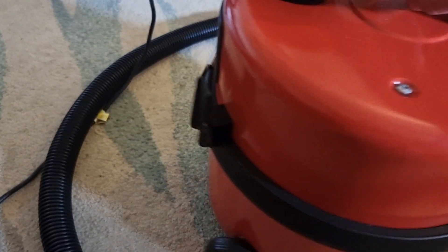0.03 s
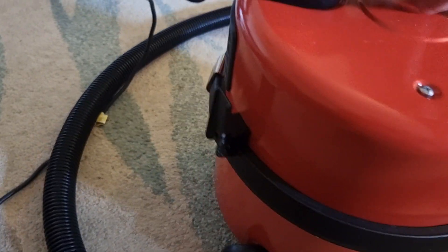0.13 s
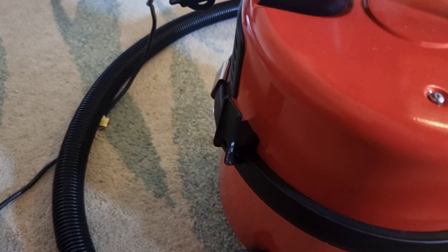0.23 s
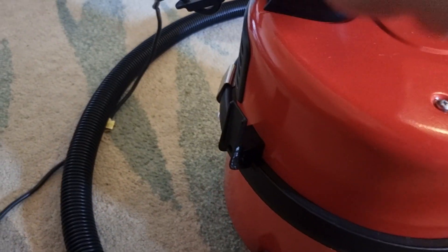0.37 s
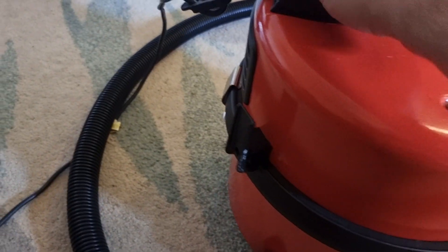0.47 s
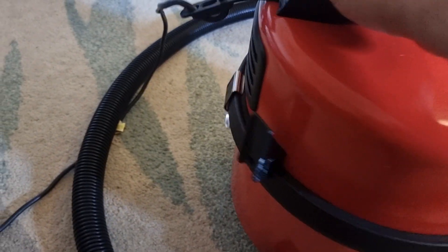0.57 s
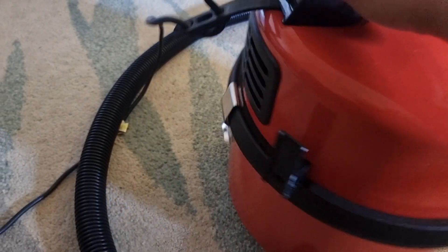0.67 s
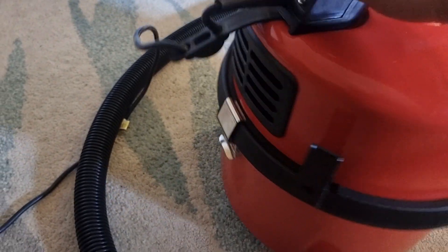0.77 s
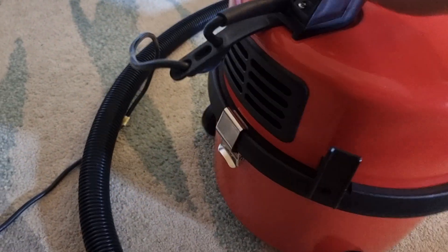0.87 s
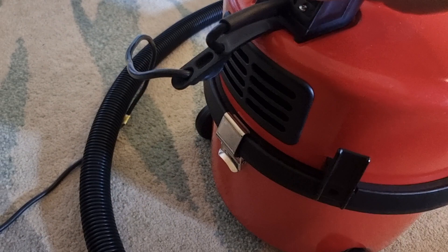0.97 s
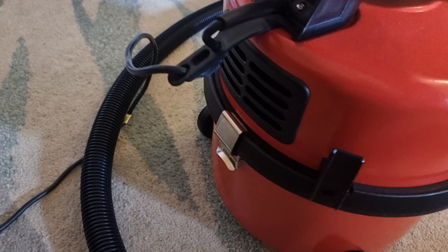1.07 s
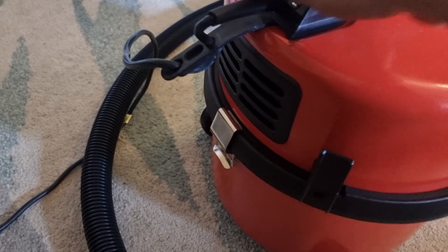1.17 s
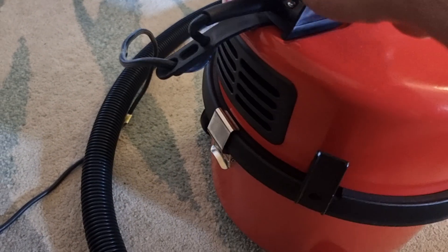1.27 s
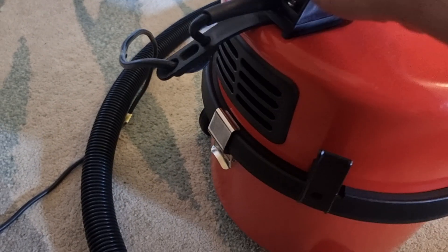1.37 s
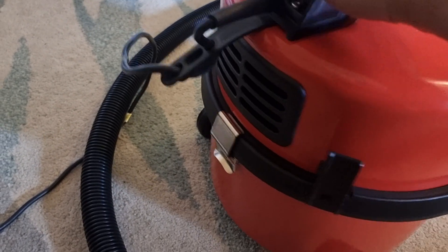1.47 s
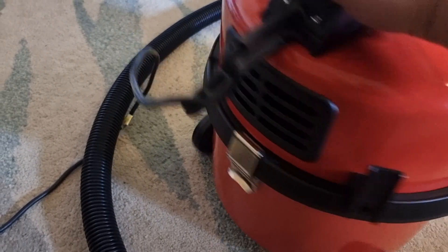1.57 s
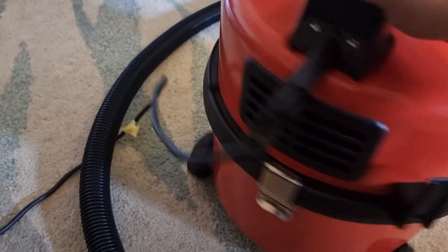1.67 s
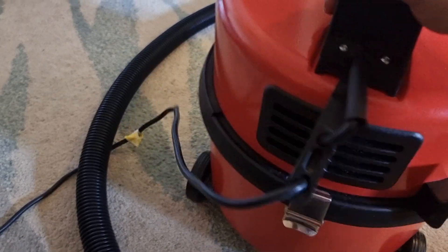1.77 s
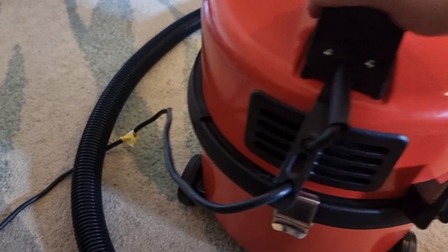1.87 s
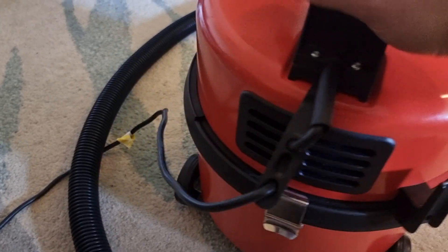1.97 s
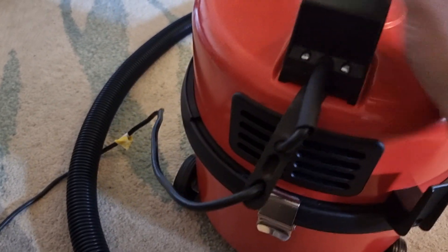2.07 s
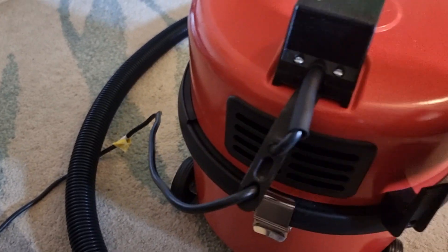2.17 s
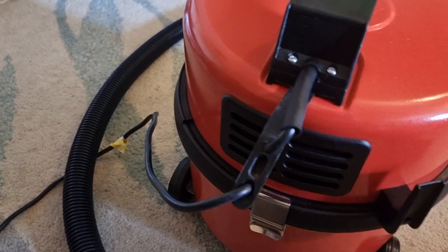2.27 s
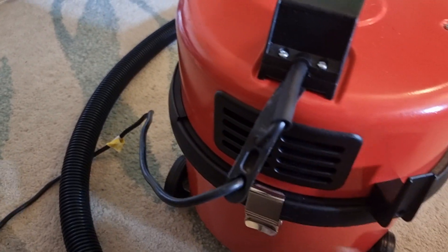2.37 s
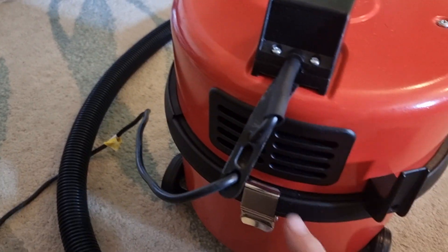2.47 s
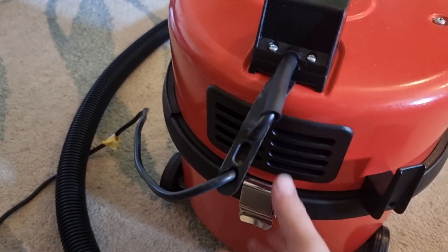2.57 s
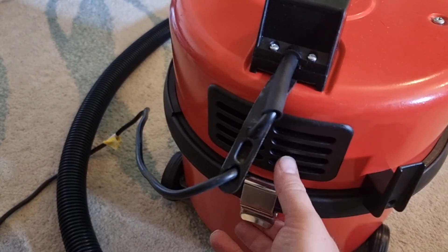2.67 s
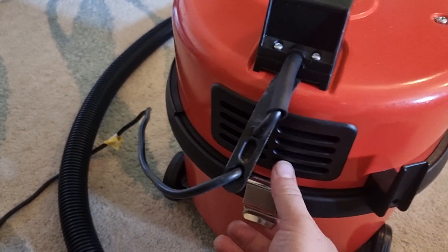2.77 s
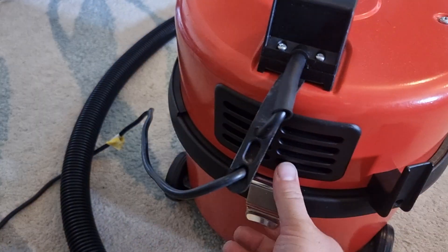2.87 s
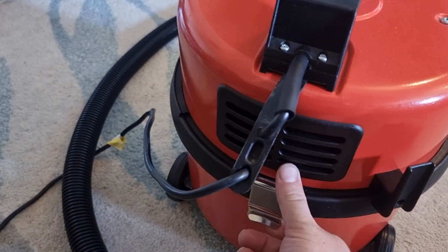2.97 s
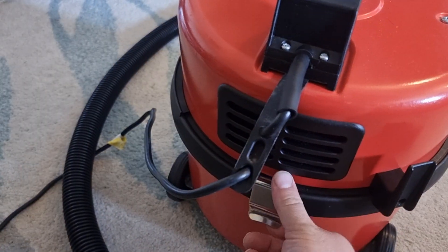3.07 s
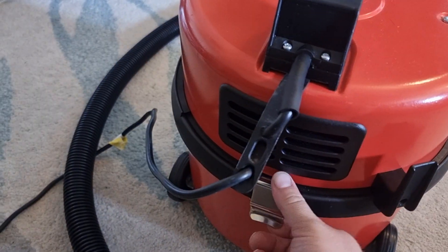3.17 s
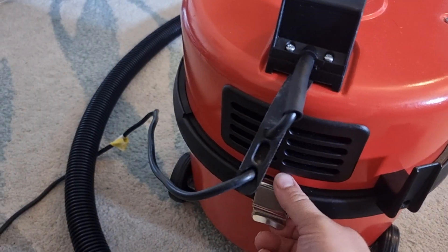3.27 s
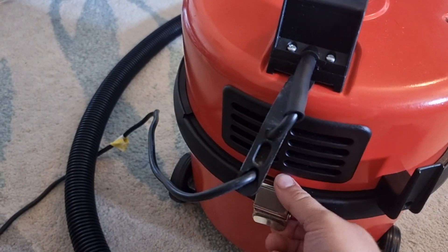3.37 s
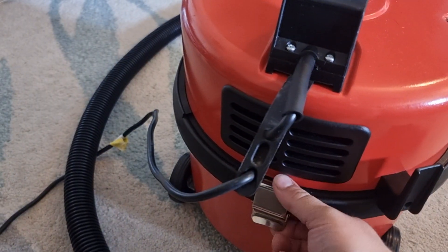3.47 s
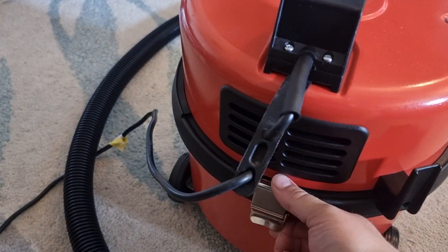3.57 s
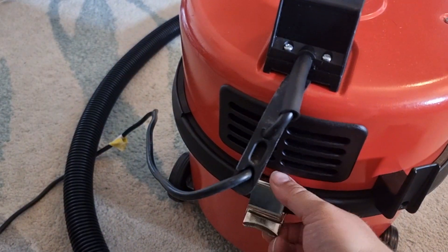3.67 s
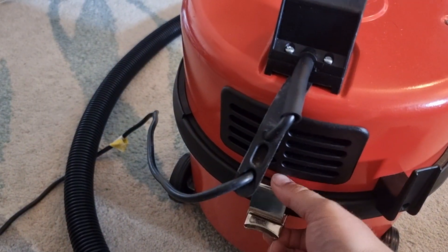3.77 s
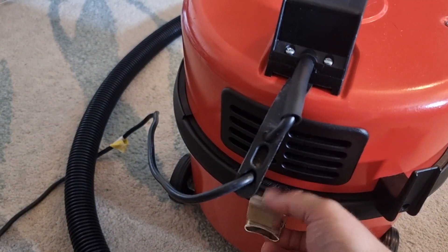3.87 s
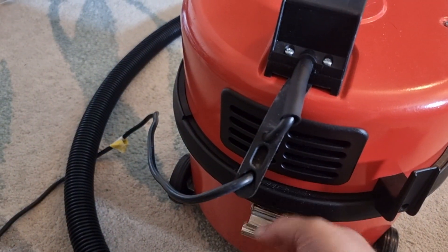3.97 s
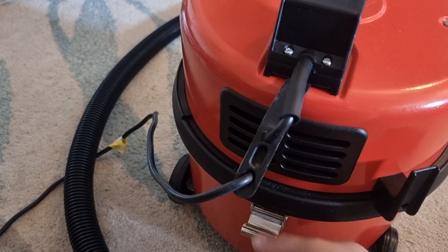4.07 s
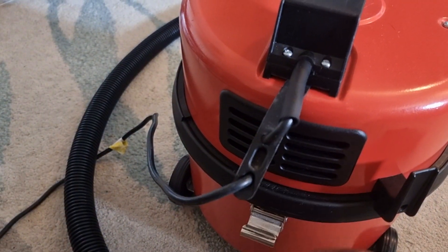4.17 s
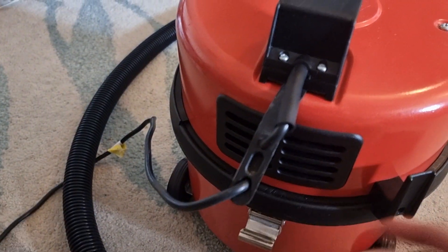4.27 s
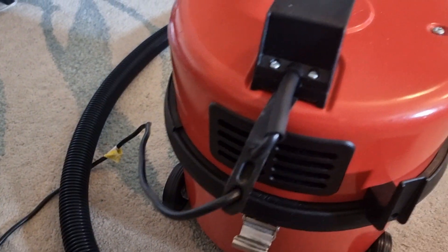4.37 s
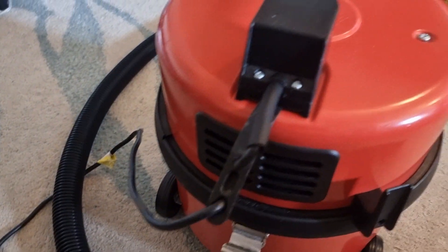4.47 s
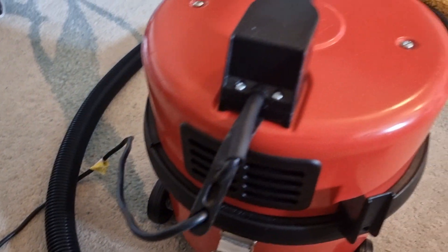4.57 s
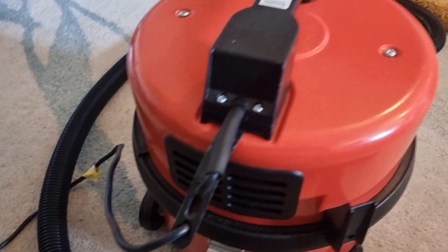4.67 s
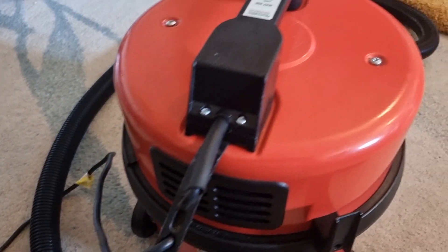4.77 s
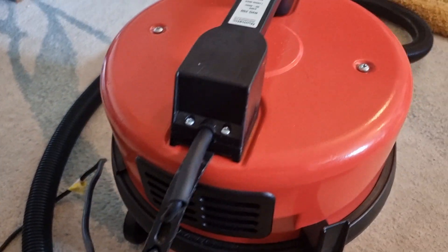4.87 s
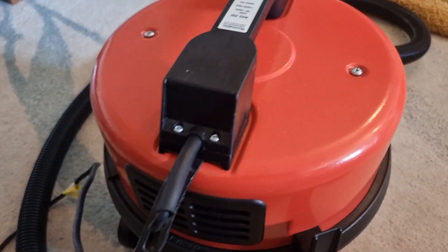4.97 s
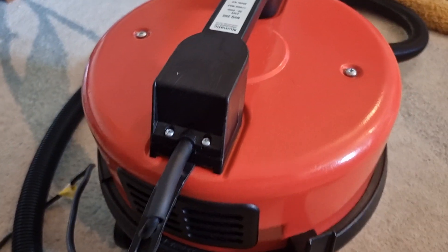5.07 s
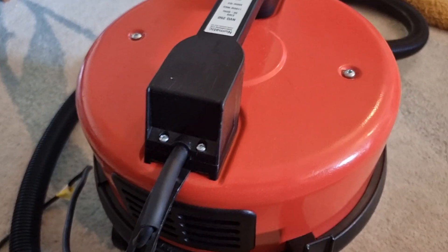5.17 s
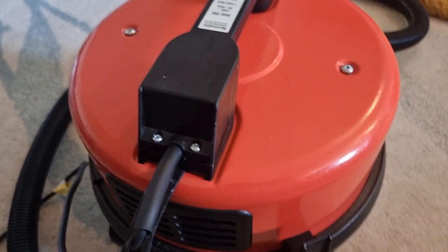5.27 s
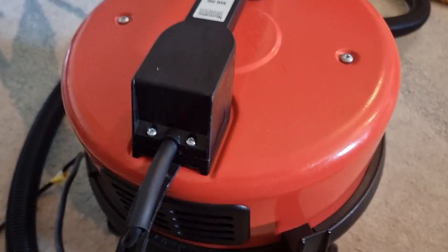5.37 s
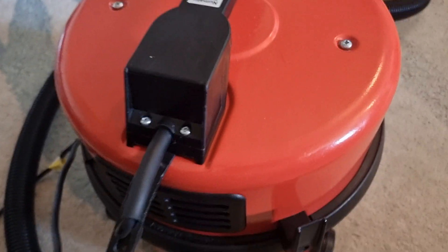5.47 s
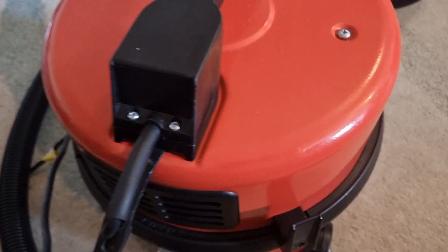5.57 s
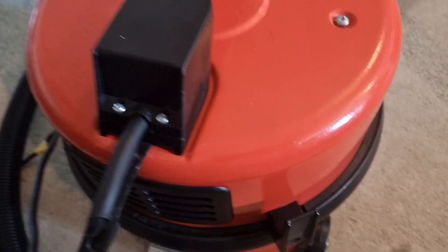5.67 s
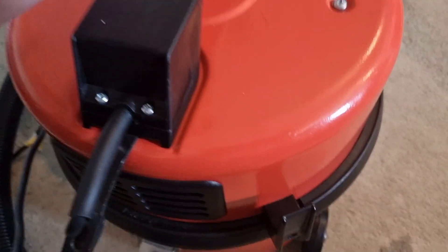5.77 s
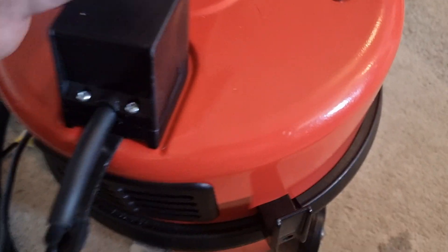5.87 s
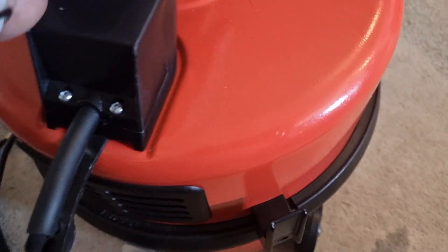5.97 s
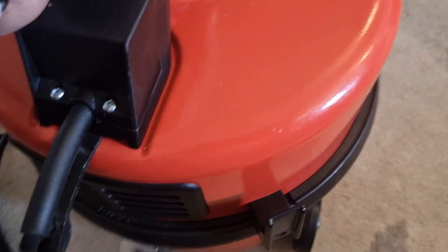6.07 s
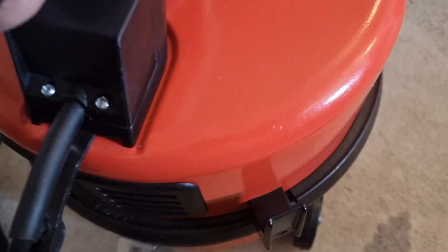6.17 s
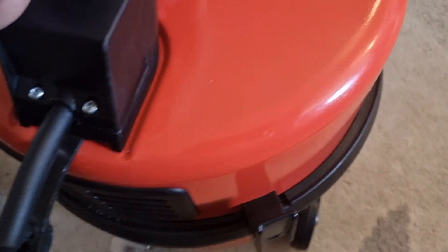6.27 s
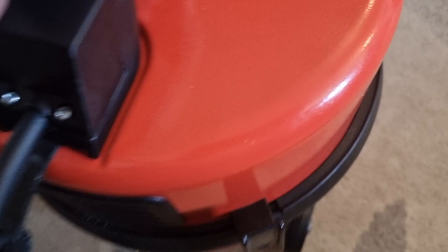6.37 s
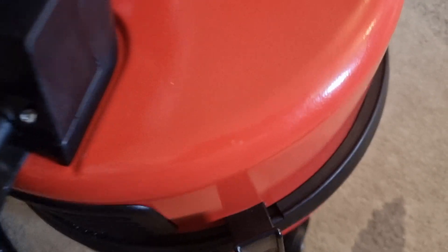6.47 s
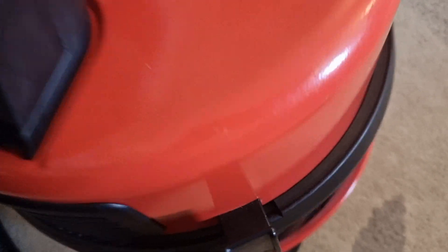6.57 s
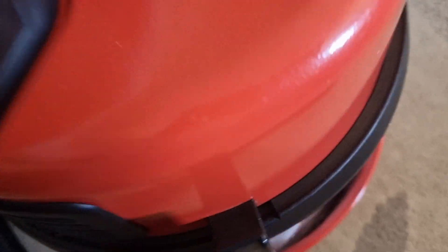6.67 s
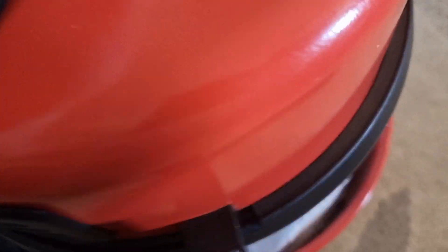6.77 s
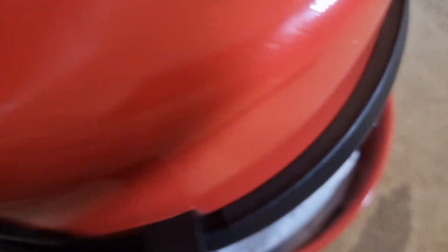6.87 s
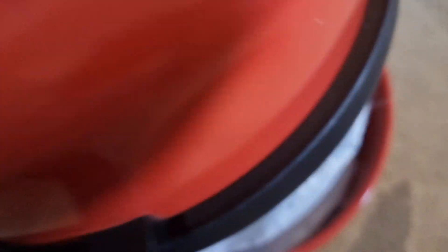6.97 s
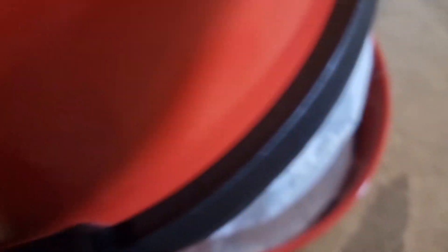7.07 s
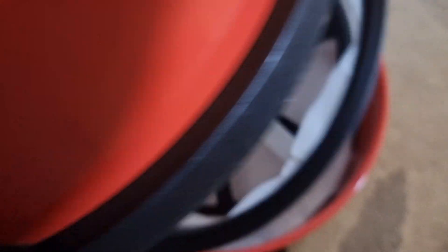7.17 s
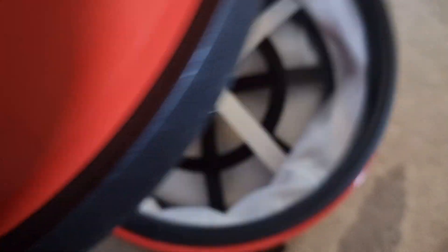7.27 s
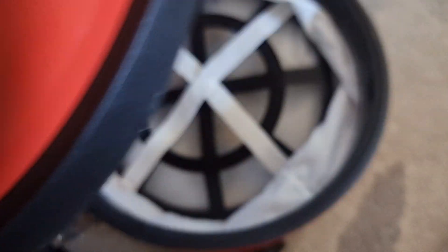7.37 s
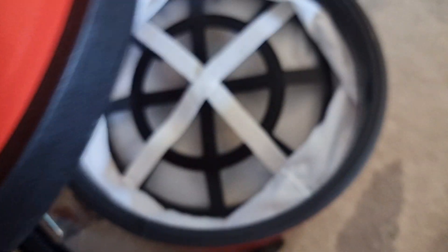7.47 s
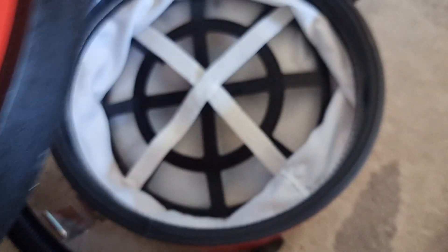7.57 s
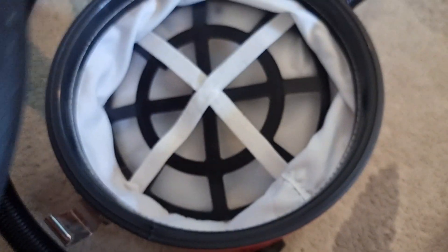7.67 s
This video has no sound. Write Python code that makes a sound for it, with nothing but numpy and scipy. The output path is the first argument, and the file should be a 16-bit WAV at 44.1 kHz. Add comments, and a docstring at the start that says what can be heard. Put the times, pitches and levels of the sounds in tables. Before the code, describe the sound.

In a small carpeted room, close stereo microphones catch a switched-off tub vacuum being turned, with light plastic ticks, soft bumps and a faint carpet drag. A latch squeaks and creaks, then two bright steel latches snap open in quick succession. Fingers tap the recording device, a hand thuds onto the hollow handle, and the plastic head knocks, scrapes and clatters against the tub rim.

```python
"""Tub vacuum cleaner unlatched

A small carpeted room, stereo, close to a switched-off tub vacuum: it is turned round and its fittings tick.
Steel latches squeak, creak in stick-slip and snap open; fingers tap the camera and grab the handle.
The plastic motor head scrapes, knocks and clatters on the tub rim as it is lifted off.
Blows are shaped noise bursts with damped modes; the drag, room tone and hiss are filtered noise, with a hum.
"""
import sys
import numpy as np
from scipy import signal
from scipy.fft import rfft, irfft, next_fast_len
from scipy.io import wavfile
from scipy.ndimage import uniform_filter1d, map_coordinates

SR = 44100
rng = np.random.default_rng(int(sys.argv[2]) if len(sys.argv) > 2 else 0)


def unload_wav(signal):
    """Save mono or channel-first audio to the path in sys.argv[1] as 16-bit WAV at rate SR, clipped to [-1, 1]."""
    wavfile.write(
        sys.argv[1],
        SR,
        np.round(np.clip(np.atleast_2d(signal).T, -1, 1) * 32767).astype(np.int16),
    )


N = 340452

# Table levels are relative: most layers add their own gain, scrapes and hum use them directly.
# the two latches snap: (time [s], snap level [dB], tub thump level [dB], left minus right [dB])
LATCH_SNAPS = [(3.7761, -1.5, -22, 1), (4.1216, -4, -27.5, 5.5)]
# ringing steel of each latch: (frequency [Hz], width [Hz], level [dB])
FRONT_LATCH_MODES = [(698, 22, -4.5), (1120, 48, -6.5), (1470, 70, -2), (1674, 45, -2), (2230, 48, 0.5),
                     (2800, 33, -2.5), (3040, 170, -3.5), (3974, 40, -2), (4550, 110, 0), (5490, 57, -8.5)]
SIDE_LATCH_MODES = [(686, 29, -22), (1242, 180, -1), (1392, 140, -0.5), (1990, 36.3, -4.5), (2555, 54, 0),
                    (3242, 72, 5.5), (3750, 35, -7), (4700, 79, -2.5), (5000, 81, -1), (6330, 130, -7)]
# the second latch clinks as it is gripped: (time [s], level [dB])
LEVER_CLINKS = [(3.967, -44), (4.02, -32)]
# ringing of its lever: (frequency [Hz], width [Hz], level [dB])
LEVER_MODES = [(601, 23, -0.5), (2620, 49, 2), (2840, 56, -14), (3250, 50, -2.5), (4950, 80, -12),
               (6700, 150, -13)]
# the tub with the head clamped on, resting loose, lifted clear: (frequency [Hz], width [Hz], level [dB])
CLOSED_TUB_MODES = [(104.93, 38, -6), (211.85, 22, -3), (312, 32, -3.5), (337, 42, 0), (483, 26, -3.5),
                    (608.5, 25, -9.5)]
LOOSE_TUB_MODES = [(83.5, 38, 3), (138.4, 25, -0.5), (186, 37, -0.5), (228, 54, -0.5), (321, 35, -12),
                   (494, 59, -16.5)]
OPEN_TUB_MODES = [(95, 45, -9), (215.4, 17, -3.5), (254, 25, -1), (321, 11.6, -4), (395, 36, -14.5),
                  (493, 32, -16.5)]
# the head knocks on the rim: (time [s], level [dB], main frequency [Hz])
HEAD_KNOCKS = [(6.438, -22, 2890), (6.457, -28, 735), (6.647, -20, 1200), (6.668, -8, 1510),
               (6.723, -31, 1150), (6.915, -32.5, 842), (7.277, -18.5, 2720), (7.337, -25, 1500),
               (7.389, -23.5, 1014), (7.403, -19.5, 703), (7.426, -12, 2750), (7.432, -3, 1480),
               (7.458, -11, 1180), (7.47, -8, 2830), (7.493, -13.5, 1080), (7.512, -12.5, 1380)]
# wall of the head: (frequency [Hz], width [Hz], level [dB])
HEAD_WALL_MODES = [(1133, 150, 4), (1440, 68, -2.5), (2260, 34, -5.5), (2474, 55, 2.5), (2700, 310, -13.5),
                   (3800, 48, 4), (4050, 44, -8), (4400, 140, -7.5), (5450, 120, -13)]
# plastic slides on plastic or under a finger:
# (loudest time [s], length [s], level [dB], main frequency [Hz])
SCRAPE_STROKES = [(0.121, 0.34, -50, 1680), (0.378, 0.31, -56.5, 5040), (1.744, .12, -43, 5000),
                  (3.19, .11, -46.5, 4770), (5.494, 0.081, -47, 2500), (6.27, .25, -61.5, 1900),
                  (6.434, 0.099, -38, 3650), (6.658, 0.11, -36, 1500), (7.072, .18, -57, 1770),
                  (7.286, 0.38, -51.5, 1800), (7.452, .14, -26, 2800), (7.518, .06, -26.5, 4500)]
# the hand takes up the handle: (time [s], level [dB])
HANDLE_GRAB = (6.026, -27)
# hollow handle: (frequency [Hz], width [Hz], level [dB])
HANDLE_MODES = [(162, 24, -5), (211.3, 18, -0.5), (296, 30, -14), (385, 16, -8), (750, 17, -14),
                (1087, 20, -15), (1466, 33, -18), (1879, 24, -22), (2067, 23, -22), (2260, 20, -25)]
# cable guard and fittings tick: (time [s], level [dB], main frequency [Hz])
FITTING_TICKS = [(0.1171, -35.5, 1480), (0.2384, -30.5, 1700), (0.5212, -35, 2980), (0.7262, -34, 1260),
                 (0.8091, -35, 1250), (0.8969, -35, 3970), (0.9303, -40, 3540), (1.1371, -42.5, 3630),
                 (1.1667, -34.5, 1700), (1.2526, -35, 4030), (1.7365, -27.5, 1250), (1.7549, -26, 1200),
                 (1.9759, -43, 4030), (2.0971, -29, 2100), (2.9114, -37.5, 2730), (6.332, -40, 1610),
                 (6.8314, -44, 2640)]
# the cable guard: (frequency [Hz], width [Hz], level [dB])
CABLE_GUARD_MODES = [(1225, 78, -0.5), (1634, 51, -9.5), (3420, 120, 2), (4230, 260, -13)]
# soft bumps of the tub: (time [s], level [dB])
TUB_BUMPS = [(.143, -39), (0.179, -39), (.22, -43), (1.757, -28.5), (1.82, -36.5), (1.865, -32.5),
             (2.1, -39), (2.262, -44.5), (4.021, -46), (6.953, -38.5), (7.403, -27), (7.525, -27)]
# the tub drags over the carpet: (time [s], strength [dB])
DRAG_STRENGTH = [(0.0, -55.5), (0.52, -63.5), (0.74, -64.5), (0.91, -64.5), (1.5, -68), (1.65, -57.5),
                 (1.78, -52.5), (2.27, -71), (2.49, -76), (2.64, -66), (2.89, -64), (3.15, -70.5)]
# fingers on the camera: (time [s], click level [dB], thump level [dB], left minus right [dB])
CAMERA_TAPS = [(1.375, -58, -48, -3), (5.2, -54, -50, 3), (5.255, -52.5, -52, 6), (5.468, -22.5, -57, 12.5),
               (5.4713, -13, -23.5, 2), (5.4982, -24.5, -46, 7), (5.5307, -18.5, -29, 7)]
# the grip on the camera shifts: (start [s], end [s], level [dB])
GRIP_SHIFTS = [(4.675, 4.798, -50.5), (5.15, 5.449, -55.5)]
# the machine lies left, then right once the camera has moved round: (time [s], left minus right [dB])
MACHINE_BEARING = [(5.55, 4.5), (6.3, -4.5)]
# course of the hiss: (time [s], level [dB])
HISS_LEVEL = [(0, -65), (4.5, -65), (4.95, -68.5), (7.72, -66)]
# the faint hum: (frequency [Hz], level [dB])
HUM_TONES = [(269.2, -65.5), (376.8, -79)]
# likeness of the two channels: (frequency [Hz], correlation [0 to 1])
CHANNEL_LIKENESS = [(30, 0.54), (130, 0.87), (300, 0.63), (600, 0.23), (1500, 0.037), (5000, .2),
                    (15000, .1)]
# colours of the noises: (frequency [Hz], level [dB])
SNAP_COLOUR = [(88, -41), (150, -11.5), (341, -4.5), (431, -7.5), (484, -4), (555, -13), (675, -7.5),
               (979, -17), (1100, -5), (1790, -11), (3290, -10), (6640, -15.5), (8560, -26.5),
               (14500, -30.5), (16000, -44)]
HOOK_COLOUR = [(300, -8.5), (800, -6), (1400, 3), (3000, 2), (6500, -16.5), (8300, -36), (15000, -40)]
PLASTIC_COLOUR = [(88, -32), (150, -6), (231, -5), (457, -10.5), (514, -6), (1140, -5), (1630, -7),
                  (2870, -7), (4950, -12.5), (5460, -15.5), (6640, -21.5), (7180, -19), (8070, -31.5),
                  (13700, -36.5), (16000, -31)]
RUB_COLOUR = [(100, -21), (300, 7.5), (700, 1), (1300, -1.5), (2800, -1.5), (4500, -2), (7000, -6.5),
              (8200, -21), (15000, -19)]
FITTINGS_COLOUR = [(200, -20), (500, 5.5), (1300, -2.5), (3500, -6.5), (6500, -9), (8200, -26),
                   (15000, -26)]
RUMBLE_COLOUR = [(24, -43), (40, -24), (80, -11.5), (305, 1.5), (350, -5.5), (496, -8), (613, -12),
                 (1210, -15), (1500, -27), (1950, -30), (3300, -120)]
BRUSH_COLOUR = [(410, -31), (700, 4), (886, -23), (1200, 0), (1750, -4.5), (2660, -6.5), (4990, -7.5),
                (7010, -14), (8100, -23.5), (15000, -25.5), (16000, -56)]
CASE_COLOUR = [(100, 11.5), (250, 0.5), (550, 3.5), (1000, -12), (1500, 1.5), (4000, 0), (7000, -4.5),
               (10500, -22.5), (11800, -7), (16000, -12)]
ROOM_TONE_COLOUR = [(15, -58), (25, -21.5), (65, -16), (123, -26.5), (141, -15), (236, -12), (266, -6),
                    (295, -12), (388, -13.5), (430, -25), (706, -22.5), (756, -33), (1500, -34.5),
                    (1950, -69.5), (3300, -120)]
HISS_COLOUR = [(470, -31), (800, -7), (978, -13.5), (1740, -10), (2870, -10), (3140, -15.5), (3930, -14),
               (7360, -18), (8440, -27.5), (16000, -21.5)]

TOP_HZ = 16100  # middle of the treble cutoff
AGE = np.arange(SR // 3) / SR  # s since a blow
TIME = np.arange(N) / SR  # s
LOOSE_S, CLEAR_S = 5, 7  # the head comes loose, then is lifted clear

# the opened lever chatters: spacing (s), first bounce's gain over the latch's table level (dB),
# loss per bounce (dB)
BOUNCE_S, BOUNCE_DB, BOUNCE_LOSS_DB = .0058, 4.5, 5.5
# the hook creaks: time and level of breaking loose, faint slips before, run after
CREAK_S, CREAK_DB = 3.297, -33
CREAK_LEAD_S, CREAK_LENGTH_S = .03, .085
CREAK_LEAD_DB, CREAK_FADE_DB_PER_S = -22, 280
SLIP_RATE, SLIP_SLOWING_S = 240, 0.034  # slips per s at first, before the unevenness; time constant
CREAK_START_HZ, CREAK_END_HZ, CREAK_SINK_S = 2900, 1290, 0.017
SQUEAK_S, SQUEAK_HZ, SQUEAK_DB = 2.885, 2760, -48
SQUEAK_ATTACK_S, SQUEAK_HOLD_S, SQUEAK_RELEASE_S = 0.026, 0.025, .028
KNOCK_REF_DB = -20  # table level of a middling knock
KNOCK_TREBLE_DB, TREBLE_PER_DB = -3.5, 0.87  # its treble shelf, and the gain per dB of force
BOOM_DB, BOOM_PER_DB = -8.5, 0.43  # its boom, which grows more slowly than the crack
STROKE_RISE, STROKE_DEPTH_DB = .32, 25.5  # share of a stroke spent swelling, and how far it swells
RATTLE_S, RATTLE_DB, RATTLE_HZ = (0.11, 2.1), -48.5, 2950  # fainter ticks: span, mean table level, middle pitch
RUMBLE_DB = 3.5  # castors, over the drag strength
BRUSH_DB, BRUSH_PER_DB = -64.5, 0.98  # pile at the mean strength, and growth per dB of strength


def amp(db):
    """Amplitude factor of a level in dB."""
    return 10 ** (np.asarray(db) / 20)


def unit(x):
    """x scaled to rms 1."""
    return x / np.sqrt(np.mean(x ** 2) + 1e-20)


def unit_blow(x):
    """x scaled to a mean energy of 1 per channel."""
    return unit(x) / np.sqrt(x.shape[-1])


def fade(t60):
    """Exponential decay after a blow, 60 dB down after t60 seconds."""
    return np.exp(-np.log(1000) * AGE / t60)


def along(points, hz):
    """Values at hz between (Hz, value) points on a log frequency axis."""
    f, v = np.transpose(points)
    return np.interp(np.log(hz + 1), np.log(f), v)


def curves(rows):
    """One value per sample for each column after the time."""
    s, *cols = np.transpose(rows)
    return [np.interp(TIME, s, c) for c in cols]


def wobble(rate):
    """A random curve of straight segments, rate knots a second."""
    knots = rng.standard_normal(int(N * rate / SR) + 4)
    return map_coordinates(knots, [TIME * rate], order=1)


def coloured(x, gain_db):
    """x through a causal minimum-phase filter, built by folding the cepstrum of its gain."""
    m = 2 * next_fast_len(x.shape[-1] // 2 + 2048)
    cepstrum = irfft(np.log(amp(gain_db(np.fft.rfftfreq(m, 1 / SR)))), m)
    cepstrum[1:m // 2] *= 2
    cepstrum[m // 2 + 1:] = 0
    response = np.exp(rfft(cepstrum))
    return irfft(rfft(x, m) * response, m)[..., :x.shape[-1]]


def shaped(x, spectrum):
    """x with the colour of (Hz, dB) points."""
    return coloured(x, lambda hz: along(spectrum, hz))


def peak_db(hz, main_hz, height_db, octaves):
    """A rounded spectral peak, down to half its dB height at octaves either side."""
    return height_db / (1 + (np.log2((hz + 1) / main_hz) / octaves) ** 2)


def noise(size):
    """White stereo noise whose two channels are most alike in the bass."""
    m = next_fast_len(size)
    likeness = along(CHANNEL_LIKENESS, np.fft.rfftfreq(m, 1 / SR))
    turn = np.arccos(np.clip(likeness, -1, 1)) / 2
    spectra = rfft(rng.standard_normal((2, m))) * [np.cos(turn), np.sin(turn)]
    mid, side = irfft(spectra, m)[:, :size]
    return np.array([mid + side, mid - side])


def patchy(x, depth_db):
    """x with drifting patches of colour, a few hundred Hz wide and a tenth of a second long."""
    z = signal.stft(x, nperseg=512)[2]
    field = uniform_filter1d(rng.standard_normal(z.shape[1:]), size=5, axis=0)
    field = uniform_filter1d(field, size=18, axis=1)
    return signal.istft(z * amp(depth_db * unit(field)), nperseg=512)[1][:, :N]


def add(track, s, sound, pan_db=0):
    """Mix a sound in at time s, pan_db louder on the left than on the right."""
    start = max(0, round(s * SR))
    part = (sound * amp([[pan_db / 2], [-pan_db / 2]]))[:, :N - start]
    track[:, start:start + part.shape[1]] += part


def ring(modes, scatter_db):
    """Damped modes of alternating sign; the higher ones reach the two microphones out of step."""
    hz, width, db = np.transpose(modes)[:, :, None]
    size, skew = rng.standard_normal((2, len(modes), 1))
    skew = skew * np.minimum(hz / 1500, 1)
    sign = (-1) ** np.arange(len(modes))[:, None]
    level = sign * width * amp(db + scatter_db * size)
    decay = level * np.exp(-np.pi * width * AGE) * (1 - np.exp(-2 * hz * AGE))
    ears = [np.sum(decay * np.sin(2 * np.pi * hz * AGE + ear * skew), 0) for ear in (-1, 1)]
    return unit_blow(np.array(ears))


def crack(spectrum, spike, t60, tail_db, tail_t60, treble_db=0, main_hz=2000, main_db=0):
    """A contact: a sharp spike, a burst of dense modes, then the hollow body dying away.
    The struck spot favours a band round main_hz and has small random resonances of its own."""
    decay = fade(t60) + amp(tail_db) * fade(tail_t60)
    burst = unit_blow(noise(len(AGE)) * decay * (1 - np.exp(-AGE / 0.00046)))
    burst[:, 0] += spike
    knots = np.geomspace(300, TOP_HZ, num=60)
    lumps = np.transpose([knots, 3 * rng.standard_normal(len(knots))])

    def gain_db(hz):
        shelf = treble_db * hz ** 2 / (hz ** 2 + 4000 ** 2)
        spot = peak_db(hz, main_hz, main_db, octaves=0.24)
        return along(spectrum, hz) + along(lumps, hz) + shelf + spot

    return unit_blow(coloured(burst, gain_db))


def bearing(s):
    """Left minus right level (dB) of the machine at time s."""
    return np.interp(s, *np.transpose(MACHINE_BEARING))


def tub_modes(s):
    """The tub rings differently with the head clamped on, resting loose or lifted clear."""
    if s < LOOSE_S:
        return CLOSED_TUB_MODES
    return LOOSE_TUB_MODES if s < CLEAR_S else OPEN_TUB_MODES


def latches():
    """Each over-centre latch flies open, rings, chatters and thumps the tub; the second also clinks."""
    out = np.zeros((2, N))
    for (s, db, thump_db, pan_db), modes in zip(LATCH_SNAPS, (FRONT_LATCH_MODES, SIDE_LATCH_MODES)):
        snap = crack(SNAP_COLOUR, spike=.05, t60=0.047, tail_db=-14.5, tail_t60=0.12)
        steel = ring(modes, scatter_db=1.5)
        add(out, s, amp(db + 13) * snap + amp(db + 12) * steel, pan_db)
        for k in range(3):
            bounce = crack(SNAP_COLOUR, spike=0.23, t60=.012, tail_db=-20, tail_t60=0.11)
            bounce_db = db + BOUNCE_DB - k * BOUNCE_LOSS_DB
            add(out, s + (k + 1) * BOUNCE_S, amp(bounce_db) * bounce, pan_db)
        thump = ring(CLOSED_TUB_MODES, scatter_db=0.0)
        add(out, s + .002, amp(thump_db + 27) * thump, pan_db=-3.5)
    for s, db in LEVER_CLINKS:
        tick = crack(FITTINGS_COLOUR, spike=0.24, t60=0.013, tail_db=-7, tail_t60=0.12)
        lever = ring(LEVER_MODES, scatter_db=1.5)
        add(out, s, amp(db + 11) * tick + amp(db + 16.5) * lever, pan_db=5.5)
    return out


def creak():
    """The latch hook sticks and slips under the thumb; as tension runs out the slips slow, sink and fade."""
    out = np.zeros((2, N))
    age = np.maximum(TIME - CREAK_S, 0)
    db = CREAK_DB + np.where(TIME < CREAK_S, CREAK_LEAD_DB, -CREAK_FADE_DB_PER_S * age)
    rate = SLIP_RATE * np.exp(-age / SLIP_SLOWING_S)
    main_hz = CREAK_END_HZ + (CREAK_START_HZ - CREAK_END_HZ) * np.exp(-age / CREAK_SINK_S)
    pressed = (TIME > CREAK_S - CREAK_LEAD_S) & (age < CREAK_LENGTH_S)
    # a slip falls wherever the running count passes a whole number
    count = np.floor(np.cumsum(pressed * rate * amp(3 * wobble(150))) / SR)
    for i in np.flatnonzero(np.diff(count)):
        slip = crack(HOOK_COLOUR, spike=.5, t60=.01, tail_db=-22, tail_t60=.1,
                     main_hz=main_hz[i], main_db=8)
        # sparser slips are each given more energy
        add(out, i / SR, amp(db[i]) * np.sqrt(SR / rate[i]) * slip, bearing(CREAK_S))
    return out


def squeak():
    """The dry latch pivot sings one short, slightly unsteady note."""
    out = np.zeros((2, N))
    corners = [-SQUEAK_ATTACK_S, 0, SQUEAK_HOLD_S, SQUEAK_HOLD_S + SQUEAK_RELEASE_S]
    swell = np.interp(TIME - SQUEAK_S, corners, [0, 1, 1, 0]) ** 2
    phase = 2 * np.pi * np.cumsum(SQUEAK_HZ * (1 + 0.0082 * wobble(300))) / SR
    add(out, 0, amp(SQUEAK_DB) * swell * np.sin(phase), pan_db=8)
    return out


def knocks():
    """The head strikes the rim: a plastic crack and short ring over the tub's boom; harder is brighter."""
    out = np.zeros((2, N))
    for s, db, hz in HEAD_KNOCKS:
        force_db = db - KNOCK_REF_DB
        treble_db = KNOCK_TREBLE_DB + TREBLE_PER_DB * force_db
        clack = crack(PLASTIC_COLOUR, spike=0.17, t60=.022, tail_db=-6.0, tail_t60=0.081,
                      treble_db=treble_db, main_hz=hz, main_db=7.0)
        wall = ring(HEAD_WALL_MODES, scatter_db=5.5)
        add(out, s, amp(db + 15.5) * clack + amp(db + 5) * wall, bearing(s))
        boom = ring(tub_modes(s), scatter_db=5)
        add(out, s, amp(BOOM_DB + BOOM_PER_DB * force_db) * boom, pan_db=-1.5)
    return out


def scrapes():
    """Sliding plastic catches in tiny, uneven slips; each stroke swells quickly and dies more slowly."""
    out = np.zeros((2, N))
    for s, length, db, main_hz in SCRAPE_STROKES:
        slips = noise(len(AGE)) * amp(5 * wobble(450)[:len(AGE)])
        rub = coloured(slips, lambda hz: along(RUB_COLOUR, hz) + peak_db(hz, main_hz, 5, octaves=0.78))
        rise = STROKE_RISE * length
        depths = [-STROKE_DEPTH_DB, 0, -STROKE_DEPTH_DB]
        stroke_db = np.interp(AGE, [0, rise, length], depths, right=-120)
        add(out, s - rise, amp(db + stroke_db) * unit(rub), bearing(s))
    return out


def handle():
    """The hand closes on the handle with a small click and a hollow thud."""
    out = np.zeros((2, N))
    s, db = HANDLE_GRAB
    click = crack(PLASTIC_COLOUR, spike=0.071, t60=0.08, tail_db=-14, tail_t60=0.09, treble_db=4.5)
    thud = ring(HANDLE_MODES, scatter_db=-0.5)
    add(out, s, amp(db + 12.5) * click, pan_db=-2.0)
    add(out, s + 0.00402, amp(db + 25.0) * thud, pan_db=-2.0)
    return out


def fittings():
    """Loose parts tick, each with its own colour; the tub bumps as it is turned and as the head settles."""
    out = np.zeros((2, N))
    rattle = []
    for s in rng.uniform(*RATTLE_S, size=6):
        rattle.append((s, RATTLE_DB + rng.normal(0, 2.5), RATTLE_HZ * 2 ** rng.normal(0, 0.62)))
    for s, db, hz in list(FITTING_TICKS) + rattle:
        tick = crack(FITTINGS_COLOUR, spike=0.076, t60=0.018, tail_db=-12, tail_t60=0.11,
                     main_hz=hz, main_db=11.0)
        guard = ring(CABLE_GUARD_MODES, scatter_db=3.5)
        add(out, s, amp(db + 14.0) * tick + amp(db + 7.5) * guard, bearing(s))
    for s, db in TUB_BUMPS:
        add(out, s, amp(db + 20.0) * ring(tub_modes(s), scatter_db=0.5))
    return out


def drag():
    """One strength drives both: castors rumble unevenly and carpet pile brushes with a shifting colour."""
    strength_db, = curves(DRAG_STRENGTH)
    push_db = strength_db - np.mean([db for s, db in DRAG_STRENGTH])
    moving = np.interp(TIME, [3.1, 3.3], [1, 0])
    rumble_db = strength_db + RUMBLE_DB + 2.1 * wobble(45)
    rumble = amp(rumble_db) * unit(shaped(noise(N), RUMBLE_COLOUR))
    pile = patchy(noise(N) * amp(2.8 * wobble(300)), depth_db=3)
    brush = amp(BRUSH_DB + BRUSH_PER_DB * push_db) * unit(shaped(pile, BRUSH_COLOUR))
    return moving * (rumble + brush) * amp([[.7], [-.7]])  # slightly to the left


def taps():
    """Fingers click on the camera case and shake it; the shifting grip adds tiny ticks."""
    out = np.zeros((2, N))
    for s, db, thump_db, pan_db in CAMERA_TAPS:
        click = crack(CASE_COLOUR, spike=0.38, t60=0.0053, tail_db=-32, tail_t60=0.06)
        add(out, s, amp(db + 9.0) * click, pan_db)
        thump = ring([(70.0, 30, 0), (109, 116, -8)], scatter_db=1)  # (Hz, width Hz, dB)
        add(out, s, amp(thump_db + 15.5) * thump, pan_db=12)
    for start, end, db in GRIP_SHIFTS:
        for s in rng.uniform(start, end, size=5):
            tick = crack(CASE_COLOUR, spike=0.48, t60=0.0033, tail_db=-32, tail_t60=0.033)
            add(out, s, amp(db + 7.5 + rng.normal(0, 2.6)) * tick, pan_db=16.0)
    return out


def room(x, t60):
    """The short answer of a carpeted room: x convolved with a decaying noise tail that builds up softly."""
    build_up = 1 - np.exp(-(AGE / 0.0076) ** 2)
    tail = unit_blow(noise(len(AGE)) * fade(t60) * build_up)
    return signal.fftconvolve(x, tail, axes=1)[:, :N]


def background():
    """Low room tone with a faint wavering hum, and thin hiss that drifts in colour."""
    tone = amp(-61.5) * unit(shaped(noise(N), ROOM_TONE_COLOUR))
    hiss_db = curves(HISS_LEVEL)[0] - 3.5
    hiss = amp(hiss_db) * unit(shaped(patchy(noise(N), depth_db=1.7), HISS_COLOUR))
    hum = np.zeros(N)
    for hz, db in HUM_TONES:
        level = amp(db + 1.3 * wobble(5.6)) * np.sqrt(2)
        hum += level * np.sin(2 * np.pi * hz * TIME + 0.45 * wobble(6))
    return tone + hiss + hum


def scene():
    """The machine in its room, with the carpet, the taps on the camera and the background."""
    machine = latches() + creak() + squeak() + knocks() + scrapes() + handle() + fittings()
    return machine + amp(-8.5) * room(machine, t60=.17) + drag() + taps() + background()


def record(dry):
    """The camera's microphones thin the deepest bass, round off high peaks and cut the top treble."""
    thin = signal.sosfilt(signal.butter(2, 40, "highpass", fs=SR, output="sos"), dry)
    soft = thin / (1 + thin ** 6) ** (1 / 6)
    m = next_fast_len(N + SR)
    # a 300 Hz wide slope centred on the cutoff
    band = np.clip((TOP_HZ - np.fft.rfftfreq(m, 1 / SR)) / 300 + .5, 0, 1)
    return irfft(rfft(soft, m) * band, m)[:, :N]


dry = scene()
out = record(dry)
unload_wav(out)
```